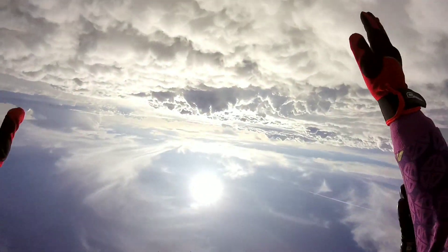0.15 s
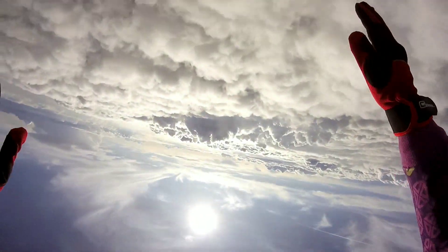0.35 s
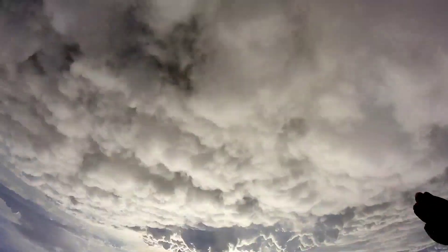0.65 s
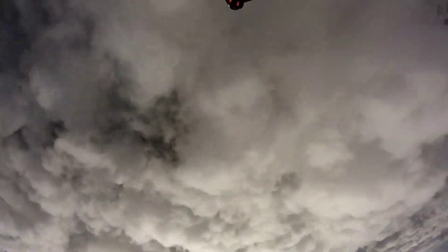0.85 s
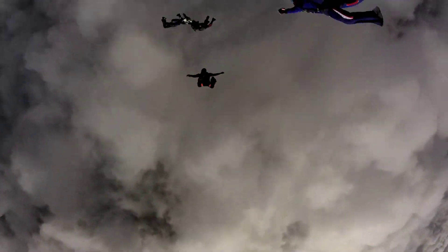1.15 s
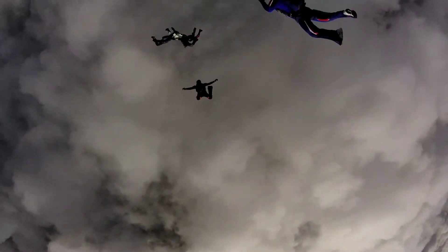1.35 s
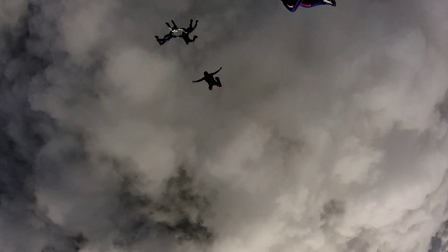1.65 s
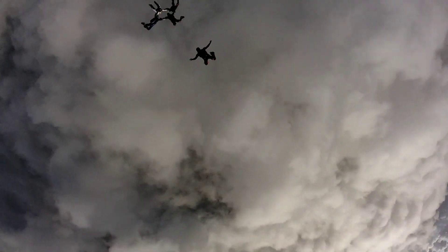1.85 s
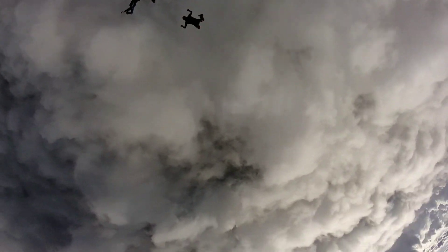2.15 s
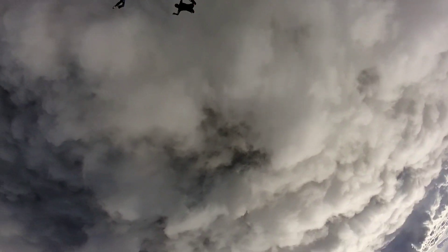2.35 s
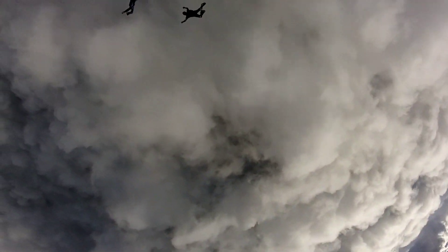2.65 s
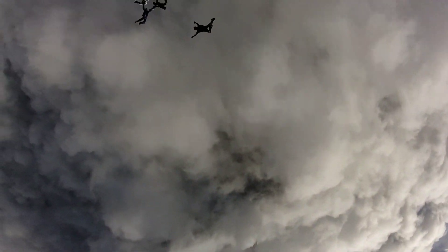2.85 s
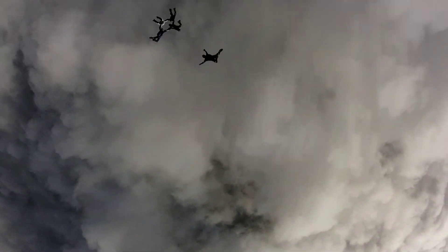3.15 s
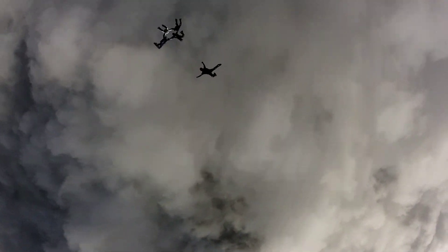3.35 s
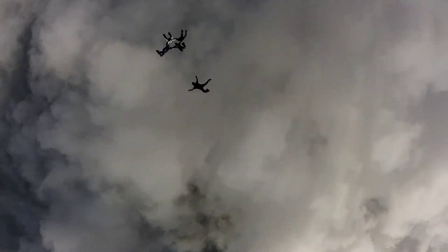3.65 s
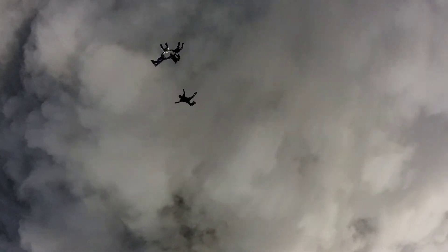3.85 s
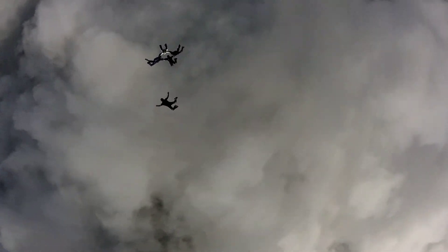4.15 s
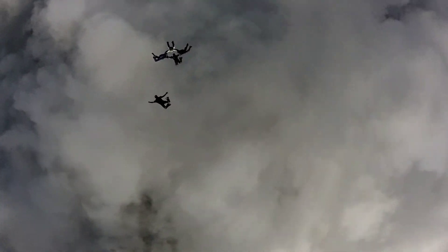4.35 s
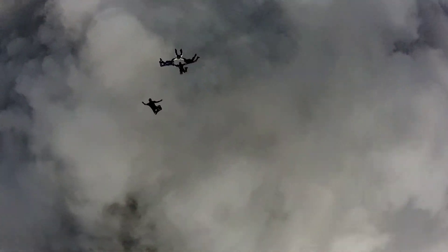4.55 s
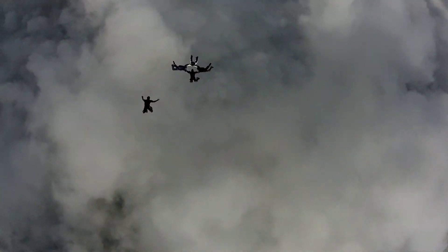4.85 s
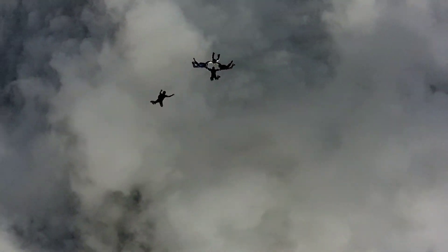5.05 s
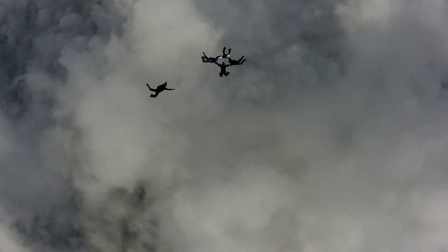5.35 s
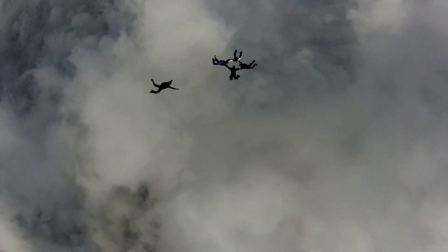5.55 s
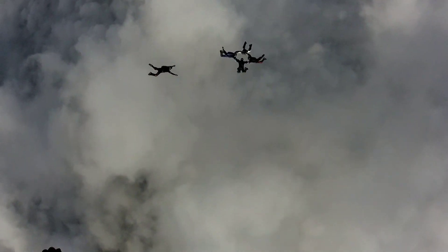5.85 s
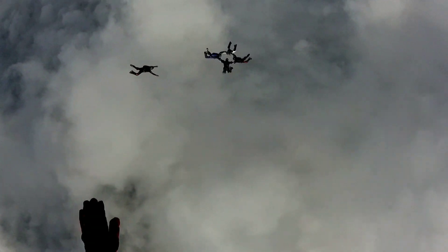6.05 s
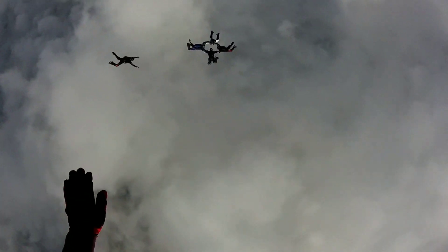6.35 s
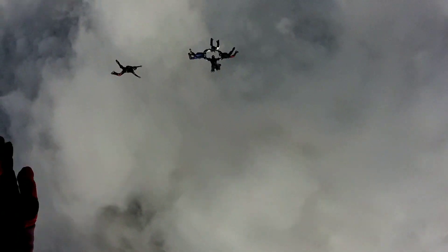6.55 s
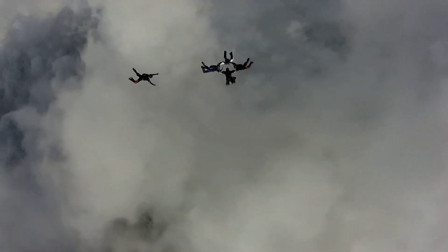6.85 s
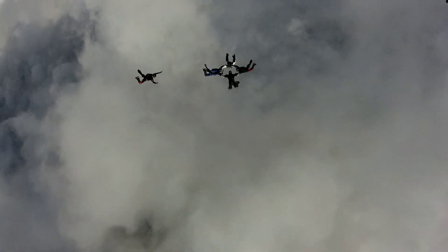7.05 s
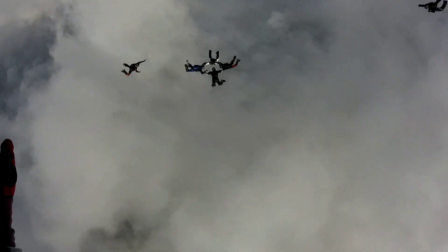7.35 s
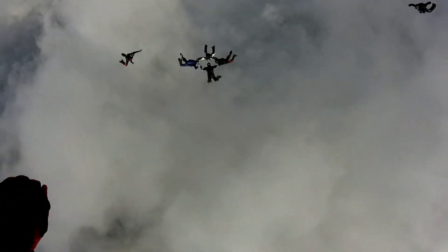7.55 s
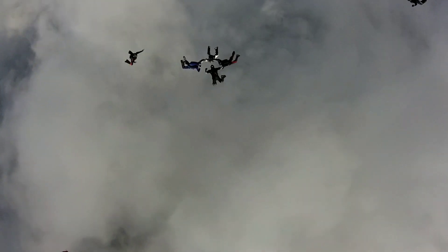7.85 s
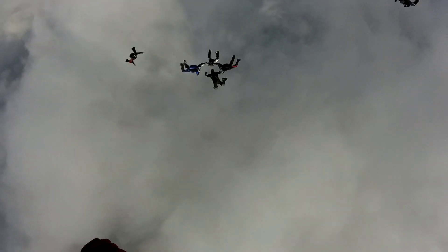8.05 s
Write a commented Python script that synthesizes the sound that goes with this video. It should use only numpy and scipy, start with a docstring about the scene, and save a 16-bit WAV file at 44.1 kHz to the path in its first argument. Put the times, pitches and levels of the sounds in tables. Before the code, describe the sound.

Air tears past a small microphone on a falling skydiver's helmet. A deep rumble, hoarse roar, hollow ringing and bright hiss surge and gust early, with rapid whistly flutter, brief dips and loud pops. The hiss falls away near two seconds, rebuilds, then the low buffeting strengthens and the stream grows steadier. Scattered hollow knocks follow, and flutter returns at the end. Open sky, no echo.

```python
"""Freefall past a helmet camera

Air rushes past the microphone: noise shaped into a deep rumble, a hoarse roar, a hollow ring and a hiss.
Shared random level swings make the stream flutter, and short cracks with a ringing tone make it pop.
The flutter is strongest early on, while the flier turns over; it calms, then returns late in the rush."""
import sys
import numpy as np
from scipy import signal
from scipy.fft import rfft, irfft, next_fast_len
from scipy.io import wavfile
from scipy.ndimage import uniform_filter1d, map_coordinates

SR = 44100
rng = np.random.default_rng(int(sys.argv[2]) if len(sys.argv) > 2 else 0)


def wrap_up_sound(samples):
    """Save the sound to the file named by the first command line argument, as 16-bit audio."""
    columns = np.atleast_2d(samples).T
    # keep every value between -1 and 1, then stretch to whole-number steps
    tamed = np.clip(columns, -1, 1)
    steps = np.round(tamed * 32767).astype(np.int16)
    wavfile.write(sys.argv[1], SR, steps)


N = 361619
TIME = np.arange(N) / SR  # s
FREQ = np.maximum(np.arange(N // 2 + 1) * SR / N, 1)  # Hz, kept above zero so its logarithm exists

# Colours of the turbulence, before each is scaled to rms 1: [f/Hz, relative level/dB]
BUFFET_COLOUR = [(10, -28), (25, -3), (45, -1.5), (75, 2.5), (110, 4), (150, -1.5), (185, -10),
                 (240, -13.5), (360, -19), (520, -30.5), (1000, -51), (4000, -100)]
CHURN_COLOUR = [(80, -14.5), (215, 4), (290, 1), (380, 1.5), (500, -5), (720, -9.5), (840, -6.5),
                (970, -10.5), (1900, -9), (2800, -4.5), (4500, -47), (12000, -80)]
HOLLOW_COLOUR = [(500, -18), (1000, -20.5), (1170, -9), (1320, -1), (1460, 1), (1680, -9), (2000, -14.5),
                 (2550, -10.5), (3000, -16), (3500, -38), (4500, -51), (12000, -75)]
HISS_COLOUR = [(300, -21), (600, -39), (1000, -22), (1400, -9.5), (1930, -7.5), (2130, -3.5), (2700, 0),
               (2920, 0), (3300, -3), (4100, -4.5), (4500, -21.5), (5400, -29.5), (6700, -23.5),
               (7500, -31), (15000, -71)]
SPRAY_COLOUR = [(2500, -50), (4500, -3), (6000, 1), (7700, -1), (9000, -4), (10100, -7), (12000, -10.5),
                (13800, -17.5), (15300, -19)]
# Air resonances of the housing's slots: [f/Hz, width at half lift/Hz, lift/dB]
SLOT_RESONANCES = [(2140, 62, 6), (2353, 240, 6), (4080, 380, 1.5), (5913, 690, 9.5), (6530, 350, 4),
                   (8200, 560, 4.5), (10900, 430, 3)]
# Peaks and dips of the gap behind the housing: [f/Hz, width at half lift/Hz, lift/dB]
GAP_RESONANCES = [(1700, 290, -25), (2153, 360, 3.5), (2676, 150, -15.5), (4600, 910, -5.5),
                  (7160, 1000, -5)]

# How fast large eddies peel off the helmet as it turns in the stream: [t/s, rate/Hz]
SHEDDING_RATE = [(0, 119.6), (1.6, 117.6), (2.2, 144.9), (2.6, 113.8), (3.5, 111.8), (4.15, 136.3),
                 (4.8, 119.9), (5.4, 99.8), (8.2, 110.5)]
# Deep buffeting in the flier's wake, before swings: [t/s, level/dB]
BUFFET_LEVEL_CURVE = [(0.0, -27), (0.25, -30.5), (0.7, -23.5), (1.0, -26), (1.12, -17), (1.6, -18.5),
                      (1.78, -19.5), (1.9, -24), (2.25, -27.5), (2.45, -28), (3.25, -26.5), (3.75, -17),
                      (4.5, -18.5), (4.8, -14.5), (5.05, -19.5), (6.6, -24), (6.8, -20), (8.2, -20.5)]
# Hoarse churning above it, before swings and trim: [t/s, level/dB]
CHURN_LEVEL_CURVE = [(0.0, -38.5), (0.66, -34), (0.86, -40), (1.13, -19.5), (1.3, -32), (1.97, -32.5),
                     (2.2, -42), (3.12, -29.5), (3.25, -34), (4.1, -19), (5.05, -26), (5.27, -22),
                     (5.9, -27.5), (6.55, -22), (7.1, -29.5), (7.27, -22), (7.42, -27), (8.2, -27.5)]
# How strongly the flow crosses the microphone's opening, before swings and trim: [t/s, ring level/dB]
HOLLOW_LEVEL_CURVE = [(0.0, -30), (0.35, -21), (0.72, -21), (0.96, -26), (1.13, -19.5), (1.34, -31),
                      (1.78, -30.5), (2.25, -33.5), (3.12, -26.5), (3.22, -31), (3.82, -24.5),
                      (4.07, -16.5), (4.45, -22), (5.1, -23), (5.45, -20), (6.8, -20.5), (6.92, -23),
                      (8.2, -25)]
# Level of the rush, which swells and fades, and drops sharply after the loud pops at 1.81 and 3.16 s;
# before swings and spray trim: [t/s, hiss level/dB, fine spray level/dB]
RUSH_LEVELS = [(0.0, -29.5, -48), (0.22, -17.5, -41), (0.45, -15, -36.5), (0.68, -16, -41.5),
               (0.98, -30.5, -44.5), (1.22, -14.5, -42), (1.33, -22, -49.5), (1.8, -18.5, -49),
               (1.84, -25, -54), (2.13, -33, -51), (2.5, -23, -41.5), (3.14, -16.5, -33.5),
               (3.19, -21.5, -40), (4.15, -27.5, -39.5), (5.5, -19.5, -41), (6.55, -22.5, -40),
               (6.95, -18.5, -41), (8.2, -18, -42)]
# How unsteadily the stream clings to the housing; a negative depth turns the swing upside down:
# [t/s, flutter depth/dB before each layer's share, whistly share 0-1]
FLUTTER_CURVES = [(0, 0.6, 0.5), (1.2, 0.5, 0.4), (1.4, 4.5, 0.9), (1.8, 2.5, 1), (2.0, 1.1, 0),
                  (2.5, -1, 0.15), (3.8, 0.37, 0), (6.7, 1.5, 0.06), (7.0, 1.4, 0.69), (7.5, 2, 0.61),
                  (8.2, 2, 0.96)]

# Single large eddies that thump the microphone: [t/s, length at half lift/s, lift of the rumble/dB]
THUMP_EVENTS = [(0.81, 0.045, 5.5), (1.575, 0.029, 7.5), (1.655, 0.015, 6), (1.75, 0.036, 3.5),
                (2.2, 0.13, 7.5), (3.0, 0.08, 4), (3.13, 0.05, 6), (4.76, 0.1, 1), (5.82, 0.075, 5.5),
                (6.08, 0.064, 3.5), (7.59, 0.059, 5.5), (7.99, 0.025, 4), (8.075, 0.035, 5)]
# The stream tears loose and the rush and ring dip: [t/s, length at half dip/s, dip/dB before spray share]
DROPOUT_EVENTS = [(1.405, 0.032, 8), (1.448, 0.029, 7), (1.525, 0.015, 2), (1.71, 0.04, 5),
                  (1.83, 0.028, 6), (7.45, 0.035, 3), (7.505, 0.023, 2), (7.89, 0.025, 4.5),
                  (7.99, 0.033, 7), (8.065, 0.016, 5.5), (8.135, 0.072, 6.5)]
# Single vortices that slap the hollow: [t/s, ring peak/dB before trim, crack relative to ring/dB]
POP_EVENTS = [(1.578, -12, -11), (1.81, -3.5, -16), (1.925, -14, -10), (2.205, -16, -7), (3.143, -12, -6),
              (3.1608, -5, -4), (3.549, -18, 7), (3.694, -13, 6.5), (3.819, -16.5, 12), (4.42, -7.5, -15),
              (5.631, -3, -16), (5.857, -4, -9), (5.934, -15.5, 7), (6.205, -14, 6.5), (7.415, -9, -6),
              (7.705, -9.5, -5)]

BUFFET_CENTRE_HZ = 110  # at this shedding rate the rumble keeps its own pitch
SURGE_DB, SURGES_PER_S = 1.32, 11  # random swing shared by rumble, roar and ring; roar and ring take part of it
CRACK_S = 0.0055  # time constant of the crack's own fade
SPRAY_DIP = 2.4  # depth of a dropout in the fine spray, relative to the hiss
TOP_HZ = 15100  # top of the camera's sound


def undb(db):
    """Turn decibels into a gain."""
    return 10 ** (np.asarray(db) / 20)


def unit(x):
    """Scale to rms 1, an average strength of one."""
    return x / np.sqrt(np.mean(x ** 2))


def shape(x, gain):
    """Filter by a gain at each frequency, then scale to rms 1."""
    size = next_fast_len(N, True)
    hz = np.arange(size // 2 + 1) * SR / size
    spectrum = rfft(x, size) * np.interp(hz, FREQ, gain)
    return unit(irfft(spectrum, size)[:N])


def colour(points):
    """Join (Hz, dB) points on a log-frequency axis and return the gains."""
    hz, db = np.transpose(points)
    return undb(np.interp(np.log(FREQ), np.log(hz), db))


def resonances(table):
    """Gain with a bell-shaped lift or dip at each (Hz, width Hz, dB)."""
    return undb(sum(db * 2 ** -(2 * (FREQ - hz) / width) ** 2 for hz, width, db in table))


def curves(table):
    """Draw each column of a (s, ...) table as a line through every sample."""
    s, *columns = np.transpose(table)
    return [np.interp(TIME, s, column) for column in columns]


def swells(table):
    """A smooth rise and fall in dB for each (s, length s at half height, dB)."""
    return sum(db * 2 ** -(2 * (TIME - s) / length) ** 2 for s, length, db in table)


def walk(rate):
    """Smooth random wander of rms 1, with `rate` new values a second."""
    steps = rng.standard_normal(N // 16)
    place = TIME * rate
    k = place.astype(int)
    ease = np.sin(np.pi / 2 * (place - k)) ** 2
    return unit(steps[k] * (1 - ease) + steps[k + 1] * ease)


def turbulence(burst_db, rate):
    """Pressure noise whose strength swells and fades by chance, giving short bursts."""
    return rng.standard_normal(N) * undb(burst_db * walk(rate))


def flutter(pressure, depth_db, lag_s):
    """Level swing in dB: the stream flaps a moment after each swing of the rumble, and by chance."""
    pumped = np.interp(TIME - lag_s, TIME, pressure)
    push = 0.6 * pumped + 1.2 * walk(120) + 0.32 * walk(24)
    swing_db = depth_db * unit(np.tanh(push))
    return swing_db - depth_db ** 2 * np.log(10) / 20  # keeps the mean power about the same


def duck_before_pops(lead_s, length_s, depth):
    """Gain 0-1 that dips briefly just ahead of each listed pop, deeper for louder ones."""
    dips = sum(undb(db) * np.exp(-((TIME - s + lead_s) / length_s) ** 2) for s, db, _ in POP_EVENTS)
    return 1 / (1 + depth * dips)


def buffet():
    """Large eddies press on the diaphragm: a deep rumble whose pitch follows their shedding rate."""
    swings = shape(rng.standard_normal(N), colour(BUFFET_COLOUR))
    shedding_hz, = curves(SHEDDING_RATE)
    # Reading the noise faster raises its pitch; reading it slower lowers it.
    place = np.cumsum(shedding_hz / BUFFET_CENTRE_HZ)
    swings = map_coordinates(swings, [place], order=3, mode="mirror")
    mean_power = uniform_filter1d(swings ** 2, size=2200)  # over about 50 ms
    strength = np.sqrt(np.abs(mean_power) + 1e-9)
    return unit(swings / strength ** 0.23)  # partly evens out loud and quiet stretches


def churn():
    """Middle-sized eddies: bursty noise coloured as a hoarse roar above the rumble."""
    return shape(turbulence(burst_db=1.5, rate=150), colour(CHURN_COLOUR))


def hollow():
    """Eddies crossing the microphone's opening stir the air behind it: bursty noise with a hollow ring."""
    return shape(turbulence(burst_db=2.0, rate=350), colour(HOLLOW_COLOUR))


def pops(rise_s, ring_hz, width_hz, gain_db):
    """A vortex bursts at the opening: a short crack, while the hollow's tone swells and dies."""
    out = np.zeros(N)
    age = np.arange(SR // 40) / SR  # s since the pop began
    swell = (1 - np.exp(-(age / rise_s) ** 2)) * np.exp(-np.pi * width_hz * age)
    swell /= swell.max()
    ring = np.sin(2 * np.pi * ring_hz * age)
    crack_band = signal.butter(4, [1500, 2800], "bandpass", fs=SR, output="sos")
    for s, db, crack_db in POP_EVENTS:
        noise = unit(signal.sosfilt(crack_band, rng.standard_normal(len(age))))
        crack = noise * np.exp(-age / CRACK_S)
        start = int(s * SR)
        out[start:start + len(age)] += undb(db + gain_db) * swell * (ring + undb(crack_db) * crack)
    return out


def hiss(hiss_db, spray_db, whistle):
    """The stream shears over the slots; as it loosens, the gap behind the housing makes it whistly."""
    shear = turbulence(burst_db=0.62, rate=260)
    housing = resonances(SLOT_RESONANCES)
    plain = shape(shear, colour(HISS_COLOUR) * housing)
    whistly = shape(shear, colour(HISS_COLOUR) * housing * resonances(GAP_RESONANCES))
    spray = shape(shear, colour(SPRAY_COLOUR) * housing)
    blend = (1 - whistle) * plain + whistle * whistly
    return undb(hiss_db) * blend + undb(spray_db + 3.0) * spray


def scene():
    """Surges move rumble, roar and ring; flutter moves roar, ring and rush; dropouts dip ring and rush."""
    hiss_db, spray_db = curves(RUSH_LEVELS)
    buffet_db, = curves(BUFFET_LEVEL_CURVE)
    churn_db, = curves(CHURN_LEVEL_CURVE)
    hollow_db, = curves(HOLLOW_LEVEL_CURVE)
    depth_db, whistle = curves(FLUTTER_CURVES)
    dip_db = swells(DROPOUT_EVENTS)

    pressure = buffet()
    flutter_db = flutter(pressure, depth_db, lag_s=0.0019)
    surge_db = SURGE_DB * walk(SURGES_PER_S)

    rumble = pressure * undb(buffet_db + swells(THUMP_EVENTS) + surge_db)
    roar = churn() * undb(churn_db + 0.5 * flutter_db + 0.74 * surge_db + 0.85)
    ring = hollow() * undb(hollow_db + 0.78 * flutter_db + 0.65 * surge_db - dip_db + 1.24)
    rush_db = hiss_db + flutter_db - dip_db
    fine_db = spray_db + 1.3 * flutter_db - SPRAY_DIP * dip_db
    rush = hiss(rush_db, fine_db, np.clip(whistle, 0, 1))
    slaps = pops(rise_s=0.0012, ring_hz=1445, width_hz=89, gain_db=-1.0)

    duck_gain = duck_before_pops(lead_s=0.0076, length_s=0.0081, depth=0.5)
    return (rumble + duck_gain * (roar + ring + rush) + slaps)[None]


def record(dry):
    """The camera rounds the highest peaks and cuts the top of the treble."""
    ceiling = 1.0  # full scale
    rounded = dry / (1 + (dry / ceiling) ** 6) ** (1 / 6)
    low_pass = signal.ellip(10, .2, 80, TOP_HZ, fs=SR, output="sos")
    return signal.sosfilt(low_pass, rounded)


dry = scene()
out = record(dry)
wrap_up_sound(out)
```